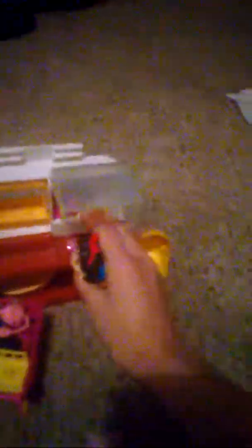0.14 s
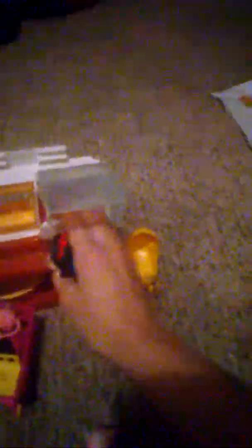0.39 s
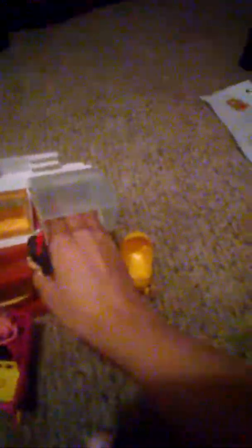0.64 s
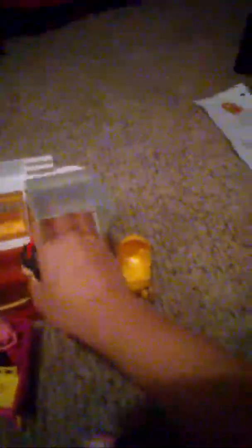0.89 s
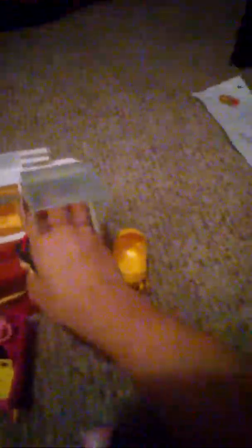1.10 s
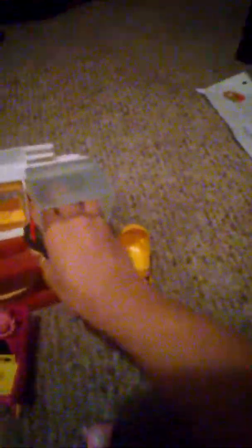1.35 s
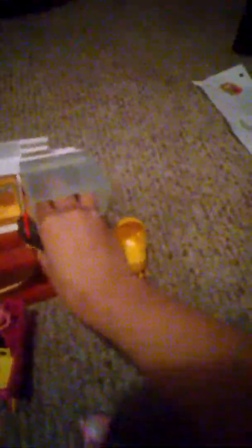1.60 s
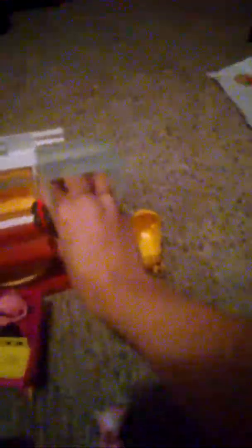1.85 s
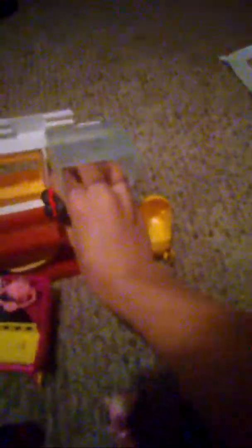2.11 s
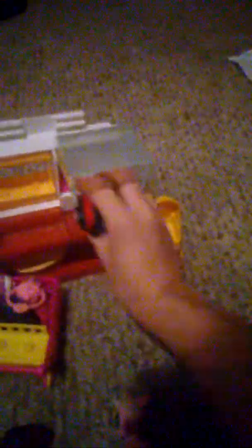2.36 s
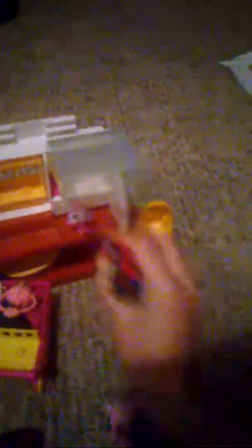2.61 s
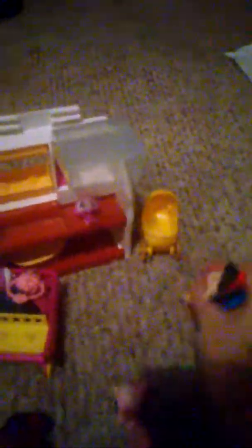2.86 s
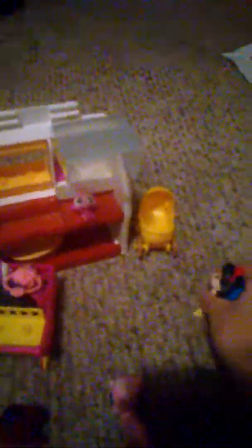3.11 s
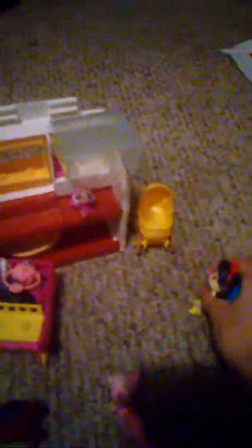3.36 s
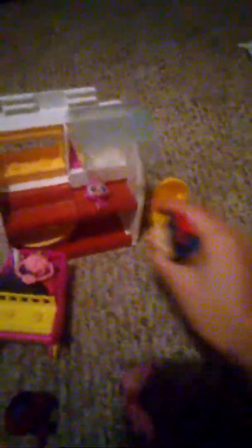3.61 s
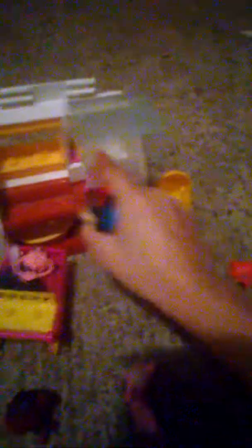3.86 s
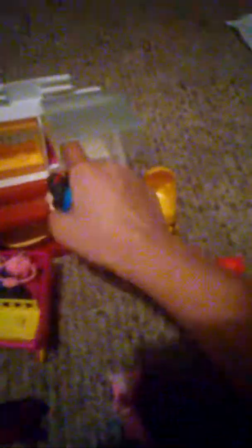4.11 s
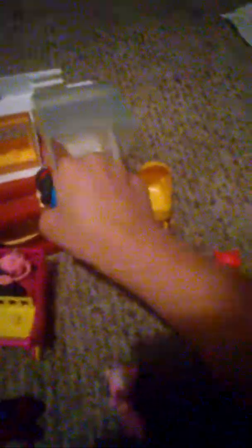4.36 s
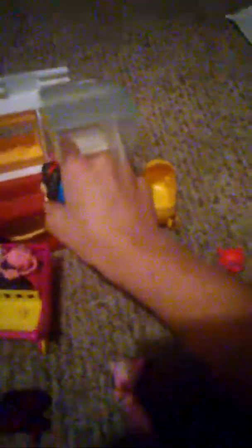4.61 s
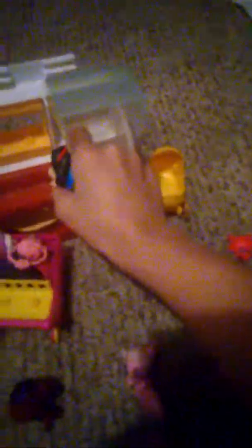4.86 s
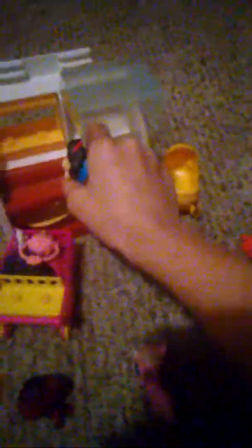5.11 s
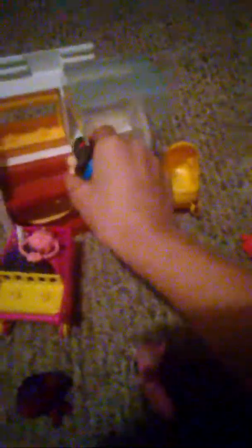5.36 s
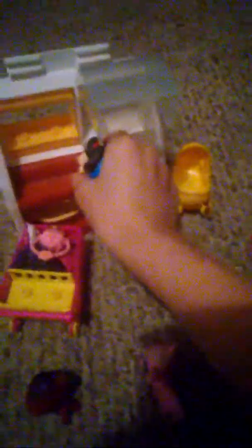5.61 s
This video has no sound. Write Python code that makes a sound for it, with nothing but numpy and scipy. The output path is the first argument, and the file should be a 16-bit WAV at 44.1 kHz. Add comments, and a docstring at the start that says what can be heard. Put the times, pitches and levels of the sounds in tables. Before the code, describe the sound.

Small hollow plastic toys knock, rattle and scrape in loose clusters in a quiet carpeted room, over faint hush and regular electrical ticking.

```python
"""On a carpeted floor, a hand picks up and shifts small plastic toys in a plastic playhouse, near a phone.
Knocks, rattles and slides shake hollow shells, each a set of short-lived modes; squeaks sing on one mode.
Fingers whisper on the plastic as softly rubbed shells; one blow adds a low thud, and one dry click is close by.
Sparse reflections make the room, shaped noise its hush, narrow noise bands its hums.
The phone's circuits tick faintly: thin spikes, a high whine and a dying fizz."""
import sys
import numpy as np
from scipy import signal
from scipy.io import wavfile
from scipy.ndimage import uniform_filter1d

SR = 44100
rng = np.random.default_rng(int(sys.argv[2]) if len(sys.argv) > 2 else 0)


def gain_from_db(level_db):
    """Convert decibel levels to linear amplitude factors (20 dB per decade)."""
    decades = np.asarray(level_db, float) / 20
    return 10 ** decades


def transcribe(signal):
    """Save signal, clipped to [-1, 1], as a 16-bit WAV file at the path in sys.argv[1]."""
    frames = np.atleast_2d(signal).T
    limited = np.clip(frames, -1, 1)
    pcm = np.round(limited * 32767).astype(np.int16)
    wavfile.write(sys.argv[1], SR, pcm)


N = 253134  # length in samples


def evened(x):
    """Scales to rms 1."""
    return x / np.sqrt(np.mean(x ** 2) + 1e-20)


def add(mix, s, sound):
    """Mixes a sound in at time s, in seconds."""
    part = mix[round(s * SR):][:len(sound)]
    part += sound[:len(part)]


HUSH_DB = -69.5  # rms level of the whole hush
# The colour of the quiet room's noise. Each row: frequency in Hz, relative level in dB.
HUSH_COLOUR = [(20, -21), (40, -17), (60, -12), (124, -4.5), (200, -23), (359, -25), (1810, -26),
               (4970, -32), (7000, -30), (10000, -34), (16000, -29.5)]


def hush(patchy_db=.6, swell_db=1.2):
    """Random short-time spectra in drifting patches; the bass swells slowly."""
    frames, hz = N // 512 + 5, np.fft.rfftfreq(2048, 1 / SR)
    real, imaginary, patches = rng.standard_normal((frames, len(hz), 3)).T
    patches = uniform_filter1d(patches, size=40, axis=0)  # smooth over frequency
    patches = evened(uniform_filter1d(patches, size=12, axis=1))  # and over time
    swell = evened(uniform_filter1d(rng.standard_normal(frames), size=12))
    bass_swell = swell * (hz[:, None] < 200)
    point_hz, point_db = np.transpose(HUSH_COLOUR)
    colour_db = np.interp(np.log(hz + 1), np.log(point_hz + 1), point_db)[:, None]
    level = gain_from_db(colour_db + patchy_db * patches + swell_db * bass_swell)
    spectra = (real + 1j * imaginary) * level
    noise = signal.istft(spectra, nperseg=2048, noverlap=1536)[1][:N]
    return gain_from_db(HUSH_DB) * evened(noise)


HUM_RISE_S, HUM_RISE_DB = 2.7, 8  # the middle hum grows for a while, then holds
# Fuzzy tones of the room. Each row: frequency in Hz, width in Hz, level in dB (at the start, for the middle one).
HUM_TONES = [(126.2, 36, -77), (354.4, 49, -86.5), (7450, 81, -85.5)]


def hums():
    """Narrow bands of noise: tones that waver in level."""
    out, t = np.zeros(N), np.arange(N) / SR
    rises_db = [0, HUM_RISE_DB * np.minimum(t / HUM_RISE_S, 1), 0]
    for (hz, width, db), rise_db in zip(HUM_TONES, rises_db):
        r = np.exp(-np.pi * width / SR)
        noise = rng.standard_normal(N) + 1j * rng.standard_normal(N)
        waver = signal.lfilter([1 - r], [1, -r], noise)
        tone = evened((waver * np.exp(2j * np.pi * hz * t)).real)
        out += gain_from_db(db + rise_db) * tone
    return out


TICK_S, TICK_EVERY_S = .06, .32  # first tick and spacing, in seconds


def ticks(mix, spike_db=-47, second_db=-51, whine_db=-79, fizz_db=-72, fizz_s=.14):
    """A regular electrical tick: two thin spikes 10 ms apart, a short high whine and a dying fizz."""
    t, starts = np.arange(SR // 3) / SR, np.arange(TICK_S, N / SR, TICK_EVERY_S)
    noise = rng.standard_normal((len(starts), len(t)))
    chances = rng.standard_normal((len(starts), 2))
    thin = signal.butter(3, 8000, "high", fs=SR)
    for s, hiss, (spike_luck, whine_luck) in zip(starts, noise, chances):
        burst = gain_from_db(fizz_db) * hiss * np.exp(-t / fizz_s)
        burst[[30, 30 + SR // 100]] += gain_from_db(np.array([spike_db, second_db]) + 1.5 * spike_luck)
        whine = gain_from_db(whine_db + 2 * whine_luck) * np.sin(2 * np.pi * 14000 * t) * np.exp(-t / .03)
        add(mix, s, signal.lfilter(*thin, burst) + whine)


# A finger or an edge squeaks on one spot.
# Each row: start in seconds, length in seconds, level in dB before uneven pressing, pitch in Hz.
SQUEAK_SPOTS = [(.57, .082, -74.5, 1450), (0.567, .082, -70, 2190), (0.885, 0.048, -68, 5000),
                (1.182, 0.12, -68.5, 2610), (1.243, 0.044, -59, 1614), (3.626, 0.4, -82, 1832),
                (3.993, 0.037, -60.5, 2157), (4.191, 0.047, -66.5, 1790), (4.3, 0.16, -67, 4310),
                (4.311, .3, -71, 2536)]


def squeaks(mix, blur=.1, uneven_db=4):
    """Uneven rubbing that sets a single mode singing."""
    noise = rng.standard_normal((len(SQUEAK_SPOTS), 3, SR // 2))
    for (s, length, db, hz), (real, imaginary, wander) in zip(SQUEAK_SPOTS, noise):
        t = np.arange(round(length * SR)) / SR
        r = np.exp(-np.pi * blur * hz / SR)  # the blur is a share of the pitch
        waver = signal.lfilter([1], np.convolve([1, -r], [1, -r]), real + 1j * imaginary)[-len(t):]
        press = gain_from_db(uneven_db * evened(uniform_filter1d(wander, size=400)))[:len(t)]
        press = press * signal.windows.tukey(len(t), .5)
        tone = evened((waver * np.exp(2j * np.pi * hz * t)).real)
        add(mix, s, gain_from_db(db) * press * tone)


def room(x, t60=.125, gap_s=.006):
    """Sparse reflections of random sign, one in every 20 samples, that build up briefly and die away."""
    taps = np.zeros(SR // 2)
    at = np.arange(0, len(taps), 20)[:-1]
    taps[at + rng.integers(0, 20, len(at))] = rng.choice([-1., 1.], len(at))
    t = np.arange(len(taps)) / SR
    taps *= gain_from_db(-60 * t / t60) * (1 - np.exp(-t / gap_s))
    return signal.fftconvolve(x, taps / np.linalg.norm(taps))[:N]


NO_MODE_HZ = 20  # a spot that favours no mode
UPPER_DB, UPPER_SHARE, TOP_DB, TOP_SHARE = 5, 1, 2.5, 2  # brightness lifts the top modes more


def contact(depth_db, bright_db, favoured_hz=NO_MODE_HZ):
    """Low, upper and top modes in dB against the middle ones, and the mode that the spot favours."""
    return depth_db, UPPER_DB + UPPER_SHARE * bright_db, TOP_DB + TOP_SHARE * bright_db, favoured_hz


COPIES = 3  # every mode rings with close neighbours from the other pieces
# Centres of the hollow, low, middle, upper and top modes. Each entry: frequency in Hz.
MODE_GROUPS_HZ = [710, 1200, 2200, 4000, 6500]
# Modes of the plastic shells, before each contact shifts them a little.
# Each row: frequency in Hz, relative level in dB, time to fall by 60 dB in seconds (held to 0.003-0.04 in use).
SHELL_MODES = [(726, -2, 0.04), (1020, -1, 0.02), (1237, 8, 0.0089), (1335, -0.5, 0.023), (1748, 1, 0.034),
               (1927, -2, 0.033), (2140, -1.5, 0.018), (2560, 0, 0.017), (2823, 2, 0.0086),
               (2985, -10.5, 0.013), (3450, 6, 0.0073), (4373, -0.5, 0.01), (4160, 1.5, 0.017),
               (5240, 2.5, 0.0082), (5880, -6.5, 0.029), (6152, 1, 0.017), (6690, 6.5, 0.0081),
               (7534, 5, 0.0028)]


def shell(low_db, upper_db, top_db, favoured_hz, luck, lift_db=9, spot_db=1.5, detune=0.012,
          apart=0.072, apart_db=-9, rise_turns=0.47, hollow=0.44, hollow_db=-15):
    """Ring of the shells; the spot of contact favours some modes and sets which way each one swings."""
    hz, db, t60 = np.tile(np.transpose(SHELL_MODES), COPIES)[:, :, None]
    own = (np.arange(len(hz)) < len(SHELL_MODES))[:, None]  # the rest are the neighbours
    spread = np.where(own | (hz < 950), detune, apart)
    hz = hz * (1 + spread * luck[0])
    db = db + np.where(own, 0, apart_db)
    t = np.arange(SR // 25) / SR
    # soft plastic takes a moment to bend
    swing = np.sign(luck[2]) * (1 - np.exp(-t * hz / rise_turns)) ** 2
    decay = gain_from_db(db - 60 * t / np.clip(t60, .003, .04))
    modes = decay * swing * np.sin(2 * np.pi * hz * t)
    # the hollow modes follow only a share of the low level
    groups_db = [hollow * low_db + hollow_db, low_db, 0, upper_db, top_db]
    colour_db = np.interp(np.log(hz), np.log(MODE_GROUPS_HZ), groups_db)
    ring = gain_from_db(colour_db + spot_db * luck[1]) * modes
    middle = (hz[:, 0] > 1600) & (hz[:, 0] < 3000)
    size = np.linalg.norm(ring[middle])
    ring = ring * gain_from_db(lift_db * np.exp(-(np.log(hz / favoured_hz) / .1) ** 2))
    small = hz[:, 0] > 950  # the small modes radiate little below their range
    high_pass = signal.butter(6, 960, "high", fs=SR, output="sos")
    thinned = signal.sosfilt(high_pass, ring[small].sum(0))
    return (thinned + ring[~small].sum(0)) / size


RATTLE_AFTER_S, RATTLE_S = 0.0017, 0.011  # delay after a knock, and length
RATTLE_DB, RATTLE_SHARE, LIGHT_DB = -56, 0.79, -49  # rattle of a light knock; it grows by a share of the blow


def rattles():
    """Loose pieces rattle after every knock, coloured like the knock."""
    return [(s + RATTLE_AFTER_S, RATTLE_S, RATTLE_DB + RATTLE_SHARE * (db - LIGHT_DB), *colour)
            for s, db, *colour in KNOCK_BLOWS]


# Rattling slides of plastic on plastic. Each row: start in seconds, length in seconds,
# strength in dB of the rubbing drive, depth in dB of the low modes, brightness in dB.
SLIDE_STROKES = [(0.574, 0.081, -77, 7, -1), (0.778, 0.067, -58.5, -19, -22), (0.89, 0.044, -63, -51, -4),
                 (1.188, 0.032, -61.5, -14, -8), (1.35, 0.042, -48.5, 0, -11),
                 (1.438, 0.085, -60.5, -8.5, -6), (1.79, 0.083, -53.5, 9, -22),
                 (2.16, 0.05, -58.5, -5, -2.5), (2.405, 0.12, -58.5, -31.5, -8),
                 (2.32, 0.055, -50.5, -12, -8), (2.472, 0.021, -48, -56, -10.5),
                 (4.445, 0.064, -49, -20.5, -7.5), (4.732, 0.017, -49.5, -7, -8.5),
                 (4.761, 0.13, -47, 0, -6), (5.235, 0.11, -57.5, -8, -11.5),
                 (5.274, 0.0095, -37.5, -17, -18.5), (5.408, 0.12, -50, -2.5, 1),
                 (5.588, 0.026, -52, -16, -4), (5.607, 0.048, -44.5, -8, -6.5)]


def slides(mix, slips_per_s=800, spread_db=3.5, rub=.6, fade_db=2.5, edge=.6, count=2):
    """Tiny uneven slips and a smooth rub drive the shells at several spots, fading along the stroke."""
    rows = SLIDE_STROKES + rattles()
    luck = rng.standard_normal((len(rows), count, 3, COPIES * len(SHELL_MODES), 1))
    slipping = rng.random((count, N)) < slips_per_s / count / SR
    slips = slipping * gain_from_db(spread_db * np.minimum(rng.exponential(1, (count, N)), 2.5))
    slips = evened(slips * rng.standard_normal((count, N)))
    drive = slips + rub * rng.standard_normal((count, N))
    for (s, length, db, *colour), spots in zip(rows, luck):
        groups_db = contact(*colour)
        parts = evened(drive[:, round(s * SR):round((s + length) * SR)]) / np.sqrt(count)
        size = parts.shape[1]
        stroke = signal.windows.tukey(size, edge) * gain_from_db(db + fade_db * np.linspace(1, -1, size))
        for part, chance in zip(parts, spots):
            add(mix, s, signal.fftconvolve(part * stroke, shell(*groups_db, chance)))


# Fingers rest and shift on the plastic, one list for each reach.
# Each row: time in seconds, rubbing level in dB, shared by the fingers before the shells ring.
GRIP_REACHES = [
    [(.7, -83), (1.1, -73), (1.6, -75), (2.05, -79.5), (2.52, -70)],
    [(3.98, -82), (4.3, -77.5), (4.62, -76), (5.1, -81.5), (5.33, -83), (5.55, -69), (5.74, -76)],
]


def grip(mix, low_db=-11, upper_db=-5, top_db=-6, uneven_db=5, count=8):
    """Each finger rubs its own spot, now more and now less, so the shells whisper between the knocks."""
    fingers = rng.standard_normal((count, 3, COPIES * len(SHELL_MODES), 1))
    level_db = np.full(N, -200.)  # silent outside the reaches
    for rows in GRIP_REACHES:
        s, db = np.transpose(rows)
        reach = np.arange(round(s[0] * SR), min(round(s[-1] * SR), N))
        level_db[reach] = np.interp(reach / SR, s, db)
    level = uniform_filter1d(gain_from_db(level_db), size=2000) / np.sqrt(count)
    for chance in fingers:
        skin, wander = rng.standard_normal((N, 2)).T
        wander = uniform_filter1d(uniform_filter1d(wander, size=2000), size=1000)
        press = gain_from_db(uneven_db * evened(wander))
        ring = shell(low_db, upper_db, top_db, NO_MODE_HZ, chance)
        add(mix, 0, signal.oaconvolve(level * press * skin, ring)[:N])


# Pieces knock on the shells. Each row: start in seconds, strength in dB before a common gain,
# depth in dB of the low modes, brightness in dB, favoured mode in Hz.
KNOCK_BLOWS = [(0.814, -68, -3, 0.5, 2040), (0.888, -58.5, -29, -9, 2140), (0.99, -54.5, -29, -27, 2140),
               (1.005, -55.5, 1, -7, 1780), (1.252, -67, -5, -3, 1510), (1.305, -56.5, -34, -10.5, 2600),
               (1.321, -34.5, -19.5, -7.5, 3450), (1.333, -35.5, -22, -10, 2640),
               (1.346, -44.5, -23, -7.5, 2500), (1.385, -52.5, -36, -6, 4070),
               (1.666, -60.5, -21, -8.5, 2430), (1.763, -54.5, -21, -4.5, 2450),
               (1.788, -33, 11, -4.5, 1267), (1.818, -40.5, -11, -3, 2450), (1.875, -56, -1, -9, 1360),
               (1.9, -50, 4, -6, 1250), (1.938, -44, 2, -5, 1320), (2.104, -62.5, -11, -15, 2570),
               (2.156, -51, -18, -8.5, 2660), (2.332, -46.5, -6, -3, 1740), (2.396, -51.5, -11, -1.5, 1950),
               (2.488, -60.5, 0, 4.5, 3420), (3.992, -56.5, 6.5, -9, 2100), (4.176, -73.5, -9, 2.5, 3450),
               (4.699, -65, -36, -15, 2580), (4.751, -23, -21, -4, 2200), (4.756, -30, -1, -13, 4160),
               (4.77, -57, -6.5, 5, 1940), (4.846, -29.5, -30.5, -12, 4310), (4.85, -32, -14, -7.5, 1980),
               (4.872, -47.5, 16, -16.5, 4130), (5.197, -69, -5, -19.5, 2020), (5.226, -67, -13, -25, 1730),
               (5.281, -38, -24, -8, 4340), (5.396, -37.5, -19, -7, 2400), (5.407, -25.5, -18, -2, 5800),
               (5.424, -32, -16, -3, 4350), (5.452, -27.5, -12, -2, 5240), (5.476, -37, -24, -4.5, 4230),
               (5.631, -39.5, -33, -45, 1800), (5.692, -52.5, -12, -9, 4350)]


def knocks(mix, contact_s=0.0027, strike=0.55, gain_db=23, crack_db=-17, crack_s=0.021):
    """Each blow is a few milliseconds of uneven contact into the shells, with a thin crack on top."""
    t = np.arange(SR // 50) / SR
    luck = rng.standard_normal((len(KNOCK_BLOWS), 3, COPIES * len(SHELL_MODES), 1))
    grit = rng.standard_normal((len(KNOCK_BLOWS), 2, len(t)))
    thin = signal.butter(1, [8000, 11000], "band", fs=SR)
    for (s, db, *colour), chance, (rough, hiss) in zip(KNOCK_BLOWS, luck, grit):
        groups_db = contact(*colour)
        grind = np.sign(rough) * (1 - np.exp(-t / 0.000064)) * np.exp(-t / contact_s)
        clean_strike = np.arange(len(t)) == SR // 1000  # one sample, 1 ms into the grind
        blow = grind / np.linalg.norm(grind) + strike * clean_strike
        ring = shell(*groups_db, chance)
        struck = signal.fftconvolve(blow, ring)
        add(mix, s, gain_from_db(db + gain_db) * struck * np.linalg.norm(ring) / np.linalg.norm(struck))
        crack = signal.lfilter(*thin, hiss) * np.exp(-t / crack_s)
        add(mix, s, gain_from_db(db + groups_db[2] + crack_db) * crack)


def thud(mix, s=1.785, db=-35, hz=540, decay_s=0.0025):
    """One heavy blow rocks the whole playhouse on the carpet: one low, quickly damped swing."""
    t = np.arange(SR // 10) / SR
    swell = (t / decay_s) ** 2 * np.exp(2 - 2 * t / decay_s)  # peaks at 1 after decay_s
    add(mix, s, gain_from_db(db) * np.sin(2 * np.pi * hz * t) * swell)


def dry_click(mix, s=2.6135, db=-52, decay_s=.0018):
    """One short click close by, a burst of mid-range noise with no ring and no room."""
    t = np.arange(SR // 100) / SR
    band = signal.butter(3, [600, 6000], "band", fs=SR)
    burst = rng.standard_normal(len(t)) * np.exp(-t / decay_s)
    add(mix, s, gain_from_db(db) * evened(signal.lfilter(*band, burst)))


def scene():
    """Toys with their room, over the hush, the hums and the ticks."""
    toys, near = np.zeros(N), np.zeros(N)
    squeaks(toys)
    slides(toys)
    grip(toys)
    knocks(toys)
    no_bass = signal.butter(4, 300, "high", fs=SR, output="sos")  # small things radiate little bass
    toys = signal.sosfilt(no_bass, toys)
    thud(toys)
    ticks(near)
    dry_click(near)
    return (toys + gain_from_db(-7.0) * room(toys) + hush() + hums() + near)[None]


def top_cut(x):
    """Nothing passes above the cut-off."""
    return signal.sosfilt(signal.butter(12, 15830, fs=SR, output="sos"), x)


def record(dry):
    """Returns the finished mix as it is heard."""
    return top_cut(dry)


dry = scene()
out = record(dry)
transcribe(out)
```